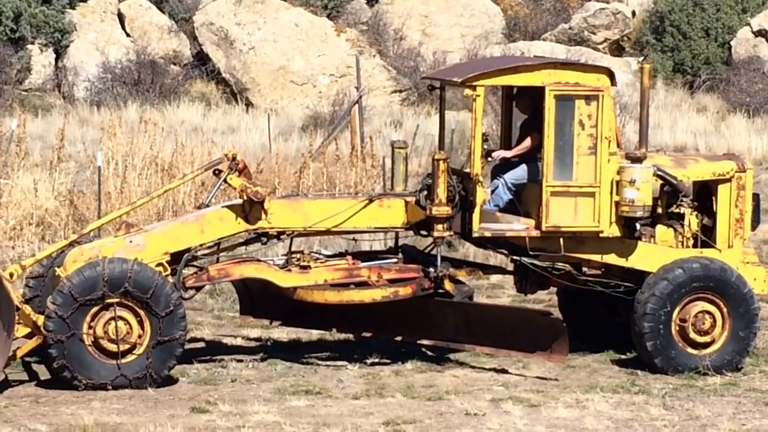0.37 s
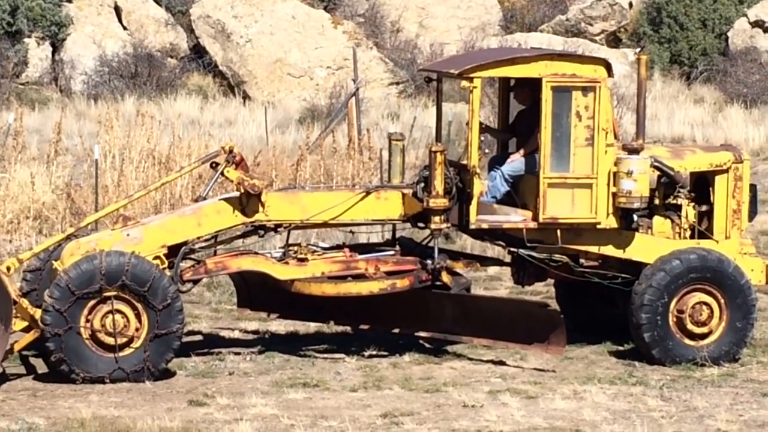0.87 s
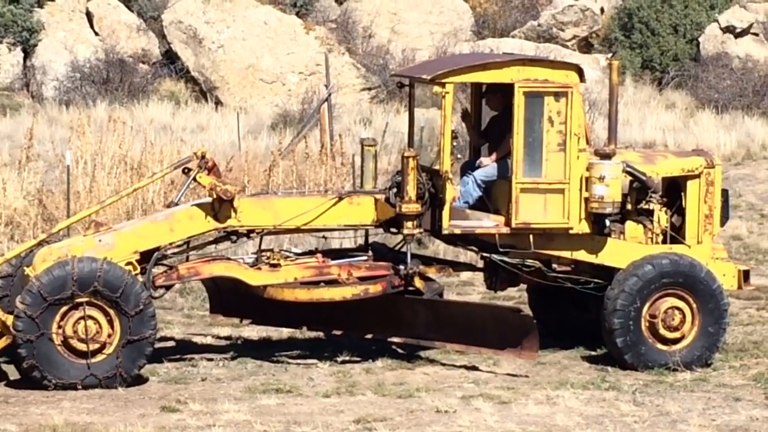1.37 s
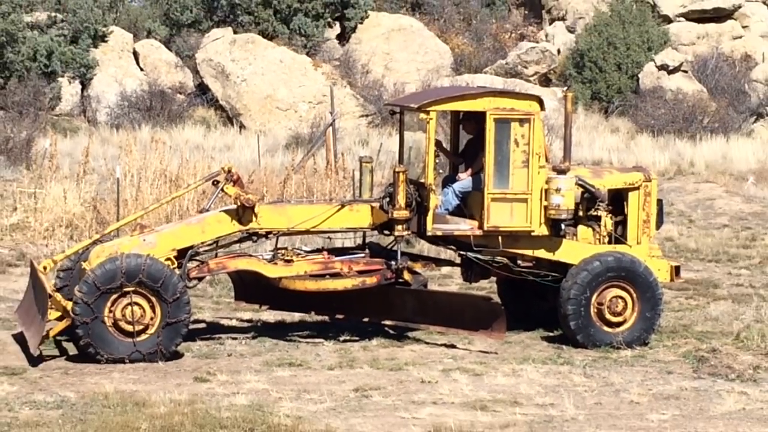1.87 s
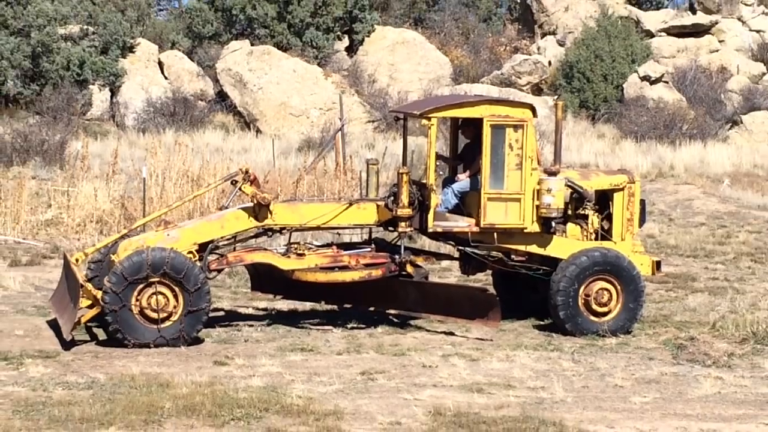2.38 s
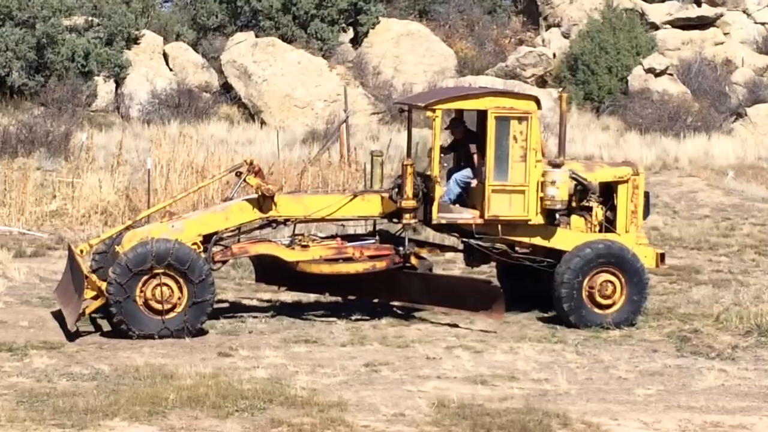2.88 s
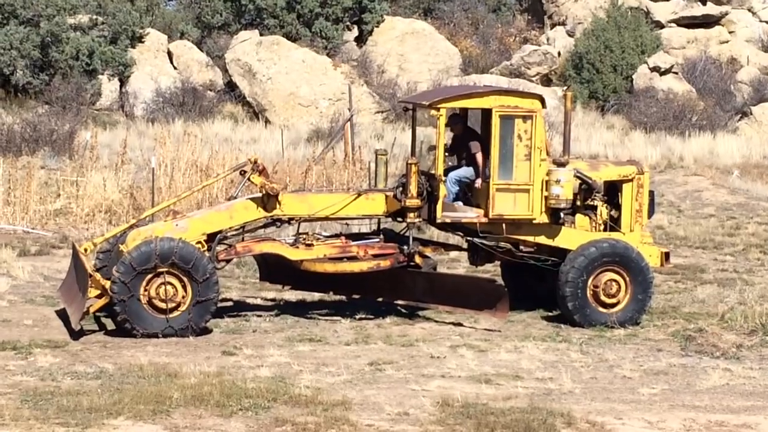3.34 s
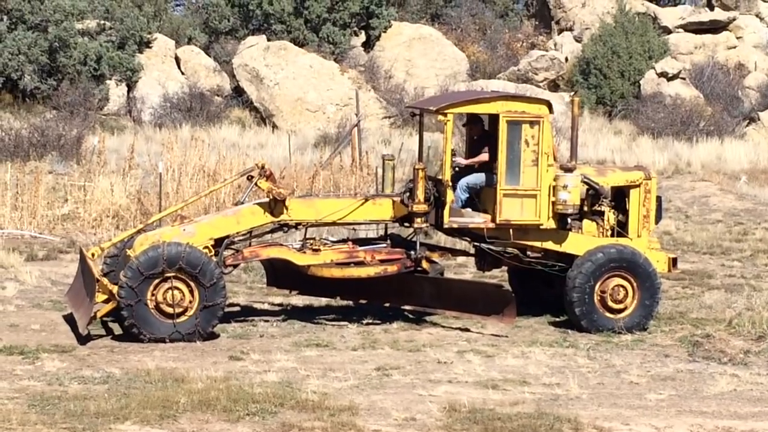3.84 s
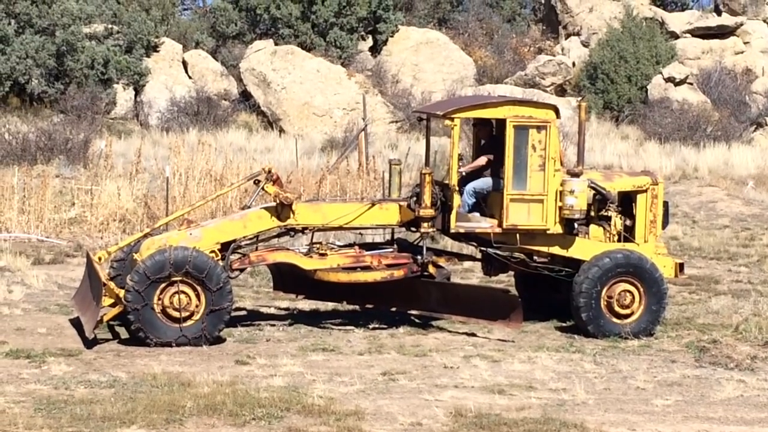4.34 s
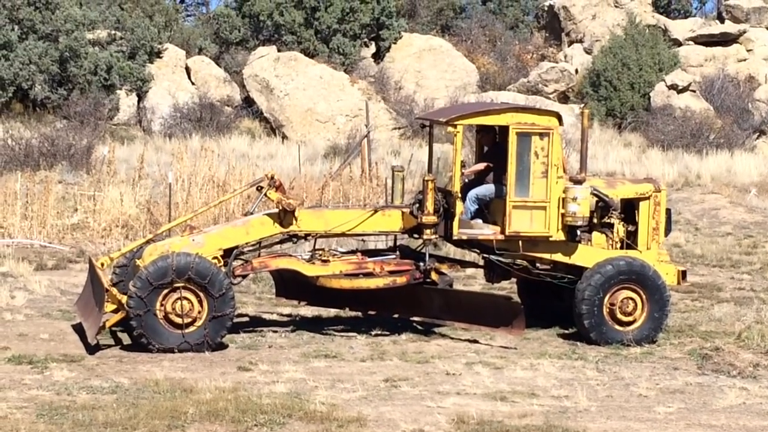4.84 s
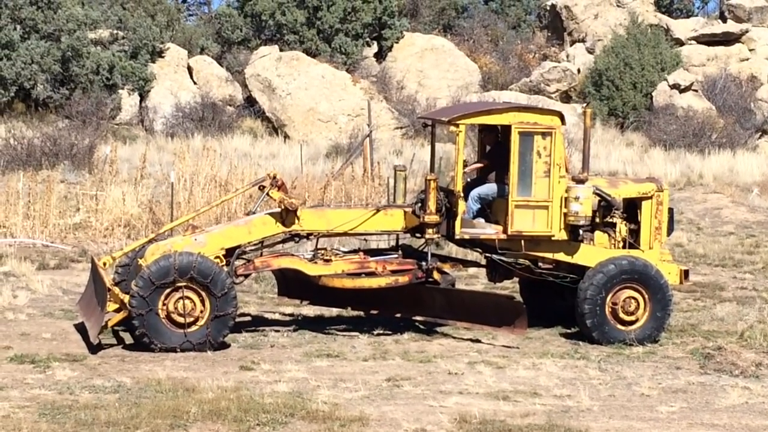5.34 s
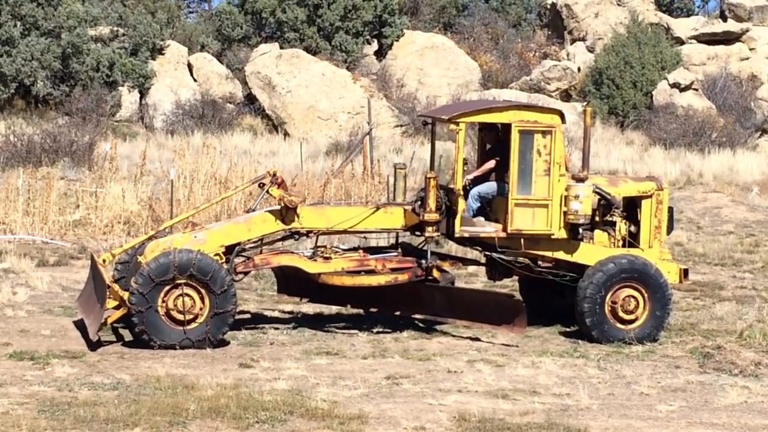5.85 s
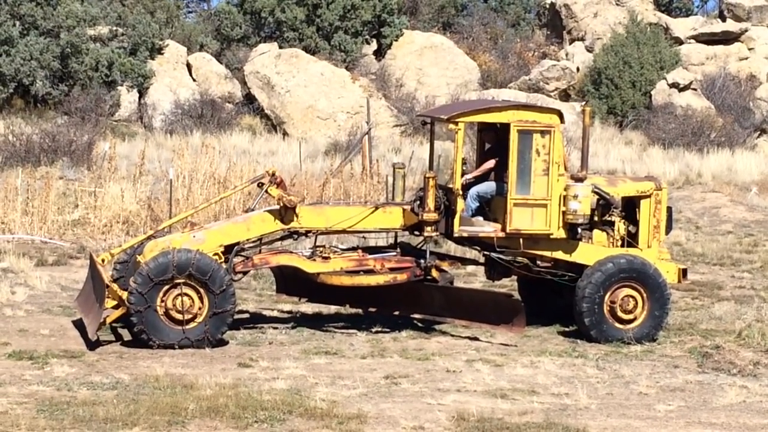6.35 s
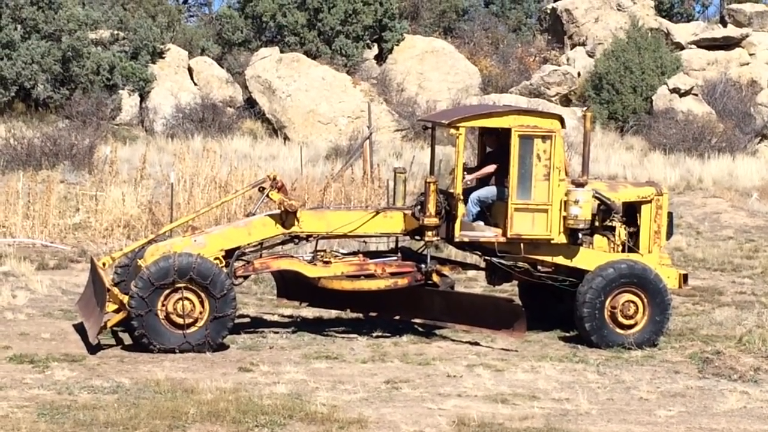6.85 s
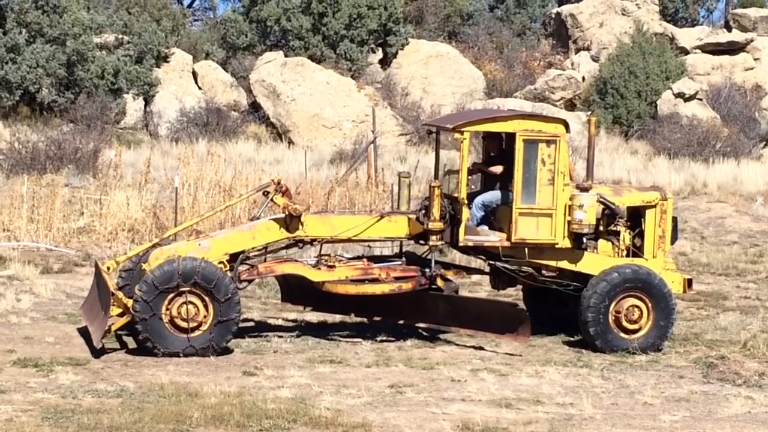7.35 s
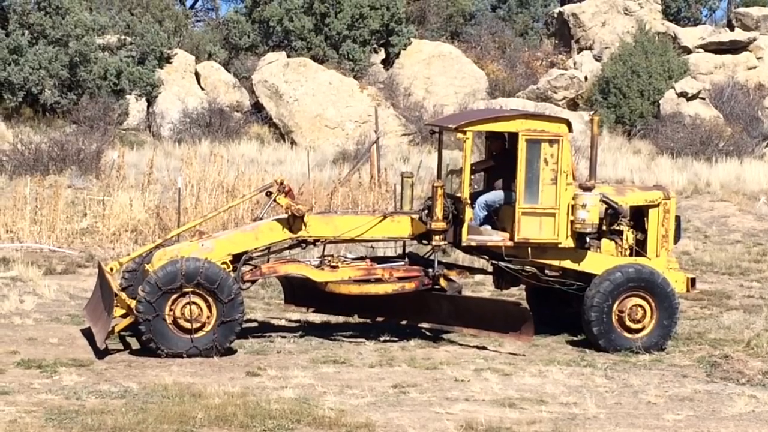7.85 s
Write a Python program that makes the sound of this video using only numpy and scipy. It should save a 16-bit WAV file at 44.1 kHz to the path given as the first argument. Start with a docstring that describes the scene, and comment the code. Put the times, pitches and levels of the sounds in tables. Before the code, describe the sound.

Steady low engine hum with soft clatter and ticking from an old grader outdoors, wind thumping the microphone, and a brief hydraulic whine and hiss midway.

```python
"""A low, even stack hum with gusts buffeting the microphone: a heavy diesel grader at a steady speed in
an open yard, heard from some metres away in a light wind. The hum is the eighth order of the engine cycle,
among other orders and in-between tones. Noise struck in each cycle makes block clatter and valve ticks;
rung modes make knocks and a few clinks. A hydraulic circuit is loaded at the start and once later: a sliding
pump whine and a hiss of shaped noise. The wind is rumble, flutter and short low pushes."""
import sys
import numpy as np
from scipy import signal
from scipy.fft import rfft, irfft
from scipy.io import wavfile
from scipy.ndimage import uniform_filter1d, map_coordinates

SR = 44100
rng = np.random.default_rng(int(sys.argv[2]) if len(sys.argv) > 2 else 0)


def to_wav(sig):
    """Store sig (one row per channel, or 1-D mono) as 16-bit WAV at the path in sys.argv[1].

    Samples outside -1..1 are clipped; the rate is SR.
    """
    pcm = np.clip(np.atleast_2d(sig), -1, 1) * 32767
    pcm = np.round(pcm).astype(np.int16)
    wavfile.write(sys.argv[1], SR, pcm.T)  # frames by channels


def to_linear_factor(level_db):
    """Convert decibel levels (scalar or array-like) to linear amplitude factors."""
    exponent = np.asarray(level_db, float) / 20
    return 10 ** exponent


N = 351036
EVEN_SPEED = 16.3  # engine cycles per second


def evened(x):
    """Scales to rms 1."""
    return x / np.sqrt(np.mean(x ** 2) + 1e-20)


def colour(x, points, modes=()):
    """Shapes x by a spectrum and by resonance bumps on it; rms 1."""
    hz = np.fft.rfftfreq(N, 1 / SR)
    f, level = np.transpose(points)
    db = np.interp(np.log(hz + 1), np.log(f + 1), level)
    for centre, width, peak_db in modes:
        db = db + peak_db / (1 + (2 * (hz - centre) / width) ** 2)
    return evened(irfft(rfft(x) * to_linear_factor(db), N))


def drift(hz):
    """Slow chance, rms 1, changing about hz times a second."""
    steps = rng.standard_normal(2000)
    return evened(map_coordinates(steps, [np.arange(N) * hz / SR], order=3))


def tone(turns, db, waver_db=0.):
    """A sine of rms db whose level wavers slowly."""
    return np.sqrt(2) * to_linear_factor(db + waver_db * drift(2.437)) * np.cos(2 * np.pi * turns)


def bell(s, half_s):
    """A smooth swell of height 1 around the moment s."""
    return np.exp(-((np.arange(N) / SR - s) / half_s) ** 2)


def shaft_speed():
    """Engine cycles per second at every sample; all parts of the machine follow it."""
    # engine speed: time_s, speed_cycles_per_s
    speeds = [(0, 16.036), (.54, 16.346), (.7, 16.308), (1.54, 16.422), (2.12, 16.386), (2.6, 16.29),
              (3.0, 16.333), (3.72, 16.265), (4.26, 16.263), (4.62, 16.309), (5.18, 16.299), (5.7, 16.227),
              (5.93, 16.105), (6.36, 16.291), (6.84, 16.386), (7.08, 16.336), (7.96, 16.38)]
    s, cycles_per_s = np.transpose(speeds)
    return np.interp(np.arange(N) / SR, s, cycles_per_s)


def gust_gain(calm_db, column):
    """The gusts add their power to a steady breeze."""
    # gusts on the microphone: time_s, half_width_s, rumble_db, flutter_db
    gusts = [(.1, .1, -34.5, -40.5), (.3, 0.21, -32, -44.5), (.62, 0.13, -29.5, -35),
             (.97, 0.2, -30, -44.5), (2.32, 0.099, -34.5, -44), (2.75, 0.068, -42, -55),
             (3.17, 0.068, -45, -34.5), (3.4, .1, -38, -40.5), (3.65, 0.13, -35, -38.5),
             (3.95, .1, -34.5, -47.5), (4.17, .13, -33, -38), (4.55, 0.057, -32, -53),
             (4.78, 0.065, -41, -43), (5.25, .1, -39, -45), (5.68, 0.12, -34, -38.5),
             (5.9, 0.076, -40, -36.5), (6.2, 0.088, -29.5, -41), (7.92, .08, -43, -41)]
    gust_power = sum(to_linear_factor(2 * row[column]) * bell(*row[:2]) ** 2 for row in gusts)
    return np.sqrt(to_linear_factor(2 * calm_db) + gust_power)


def wind():
    """Air pushing on the microphone: lumpy low rumble, a higher flutter in the gusts, and short pushes."""
    # spectrum of the rumble: frequency_hz, relative_density_db_per_hz
    rumble_spectrum = [(15, -16), (43, -9.5), (65, -1), (110, -4), (150, -9.5), (250, -32), (800, -67)]
    # spectrum of the flutter: frequency_hz, relative_density_db_per_hz
    flutter_spectrum = [(90, -26), (140, 0), (200, -0.5), (250, -12), (320, -26), (800, -69)]
    # single buffets: time_s, peak_db, pitch_hz
    buffets = [(0.136, -25, 81), (0.567, -27, 190), (.741, -28, 90), (0.955, -23, 80), (1.138, -28, 85),
               (2.288, -17, 89.5), (2.311, -22, 206), (2.848, -29, 200), (3.168, -28, 196),
               (3.712, -44, 180), (6.174, -22, 76), (6.186, -20.5, 354), (6.198, -23, 85),
               (6.222, -30, 111)]
    calm_rumble_db, calm_flutter_db = -40, -52.5
    rumble = colour(rng.standard_normal(N), rumble_spectrum)
    out = gust_gain(calm_rumble_db, column=2) * to_linear_factor(1.9 * drift(14)) * rumble
    flutter = colour(rng.standard_normal(N), flutter_spectrum)
    out += gust_gain(calm_flutter_db, column=3) * to_linear_factor(2.2 * drift(25)) * flutter
    t = np.arange(N) / SR
    for s, db, hz in buffets:
        u = (t - s) * hz
        out += to_linear_factor(db) * np.exp(-2.5 * u ** 2) * np.cos(2 * np.pi * u)
    return out


def clinks():
    """A loose part clinks now and then: a soft blow rings two dull modes."""
    # blows: start_s, level_db
    clink_times = [(6.9, -33), (7.745, -35)]
    # ringing modes of the part: pitch_hz, relative_level_db, t60_s
    clink_modes = [(975, -1, .12), (1135, -4, 0.11)]
    out = np.zeros(N)
    for start, db in clink_times:
        s = np.maximum(np.arange(N) / SR - start, 0)
        onset = np.minimum(s / .006, 1)
        for hz, mode_db, t60 in clink_modes:
            out += to_linear_factor(db + mode_db - 60 * s / t60) * onset * np.sin(2 * np.pi * hz * s)
    return out


def knocks(turn):
    """Each knock rings a casting briefly, a little harder, softer, higher or lower every time."""
    # three knocks in each cycle: place_in_cycle_0_to_1, level_db
    knock_places = [(.4, -42), (.895, -38), (.985, -40)]
    # ringing modes of the casting: pitch_hz, relative_level_db, t60_s
    knock_modes = [(1300, -4, 0.026), (1582, -1, 0.038), (2050, -3.5, .025)]
    out = np.zeros(N)
    for place, db in knock_places:
        since = turn - place + 1
        pitch_luck, level_luck = rng.standard_normal((200, 2))[since.astype(int)].T
        s = since % 1 / EVEN_SPEED
        ring = 0
        for hz, mode_db, t60 in knock_modes:
            bent_hz = hz * (1 + .015 * pitch_luck)
            ring = ring + to_linear_factor(mode_db - 60 * s / t60) * np.sin(2 * np.pi * bent_hz * s)
        out += to_linear_factor(db + 1.6 * level_luck) * np.minimum(s / .001, 1) * ring
    return out


def hydraulics(turn):
    """The pump whines unevenly between two orders, throbbing once a cycle, while oil hisses through a valve."""
    # hydraulic loads: start_s, end_s, hiss_db, whine_surge_as_valve_shuts_db, whine_lingers_s
    loads = [(-.5, 0.233, -50.5, 2.5, .06), (5.143, 5.92, -54.5, 10, .27)]
    # spectrum of the oil hiss: frequency_hz, relative_density_db_per_hz
    hiss_spectrum = [(1470, -21), (2500, 0), (3580, -0.5), (4160, -2), (4560, -4), (5710, -6.5),
                     (6390, -7.5), (9150, -11), (10300, -13), (13500, -16), (15200, -24.5)]
    # resonances on the hiss: centre_hz, width_hz, bump_db
    hiss_modes = [(4250, 130, 10), (5650, 200, 3), (9000, 900, 3.5)]
    whine_db, linger_db, fade_db_per_s = -48.5, -1.5, 110
    whine_order, slip_orders_per_s = 39.33, .7  # the whine slides down through a load
    load_rise_s, surge_s, shut_s = .09, .073, .044
    hiss_climb_db_per_s, hiss_share_of_surge = 6.5, .26
    t = np.arange(N) / SR
    whine_gain, hiss_gain, order = 0, 0, whine_order
    for start, end, hiss_db, surge_db, linger in loads:
        rise = np.clip((t - start) / load_rise_s, 0, 1) ** 2
        surge = surge_db * bell(end, surge_s)
        climb = -hiss_climb_db_per_s * np.clip(end - t, 0, 1) + hiss_share_of_surge * surge
        shutting = np.clip(1 + (end - t) / shut_s, 0, 1) ** 2
        hiss_gain = hiss_gain + to_linear_factor(hiss_db + climb) * rise * shutting
        after = np.where(t > end, linger_db, 0.) - fade_db_per_s * np.maximum(t - end - linger, 0)
        whine_gain = whine_gain + to_linear_factor(whine_db + surge + uniform_filter1d(after, size=2000)) * rise
        order = order + slip_orders_per_s * (end - t) * (t > start) * (t < end + 1)
    turns = np.cumsum(order * shaft_speed()) / SR
    throb = 1 + .5 * np.cos(2 * np.pi * turn)
    whine = tone(turns + .08 * drift(25), 2.2 * drift(20)) * throb
    hiss = to_linear_factor(.41 * drift(40)) * colour(rng.standard_normal(N), hiss_spectrum, hiss_modes)
    return whine_gain * whine + hiss_gain * hiss


def blows(turn, column, decay_turns, spread_db):
    """Gain that steps up or down at each blow and settles back; every blow is a little harder or softer."""
    # blows in each cycle: place_in_cycle_0_to_1, over_block_rattle_db, over_valve_rustle_db
    blow_places = [(.4, 2, 3.5), (.63, 8, -3), (.67, -6.5, 9.5), (0.892, -1.5, -3), (0.929, 3, 5),
                   (0.149, 3, -2.5)]
    gain = np.ones(N)
    for row in blow_places:
        since = turn - row[0] + 1
        luck = to_linear_factor(spread_db * rng.standard_normal(200))[since.astype(int)]
        gain += (to_linear_factor(row[column]) - 1) * luck * np.exp(-(since % 1) / decay_turns)
    return uniform_filter1d(gain, size=170)


def valves(turn):
    """Bright noise rustles, with sharp ticks where blows in the cycle lift it."""
    # spectrum of the rustle: frequency_hz, relative_density_db_per_hz
    valve_spectrum = [(1410, -27.5), (2400, -1.5), (2700, -4), (3310, -4.5), (6360, -16.5), (8850, -20),
                      (13500, -36), (14500, -44), (15200, -53)]
    valves_db = -54
    rustle = rng.standard_normal(N) * blows(turn, column=2, decay_turns=.041, spread_db=3)
    return to_linear_factor(valves_db + .51 * drift(30)) * colour(rustle, valve_spectrum)


def block(turn):
    """The same parts strike in order every cycle, so part of the rattle repeats, mostly its middle."""
    # spectrum of the rattle: frequency_hz, relative_density_db_per_hz
    block_spectrum = [(200, 0.5), (320, -0.5), (420, -1), (520, -0.5), (700, -2.5), (1100, -2.5),
                      (1600, -3.5), (2050, -5), (2500, -16.5), (4000, -40.5)]
    # resonances of the block: centre_hz, width_hz, bump_db
    block_modes = [(564, 8, 2), (670, 40, 1), (839, 28, 5), (977, 40, 3.5), (1160, 96, 2.5), (1454, 45, 4),
                   (1470, 73, 1), (1840, 63, 4)]
    block_db = -41  # at even speed or above
    pattern = rng.standard_normal(2048)
    place = (turn + .0015 * drift(5)) % 1 * 2048
    repeated = np.interp(place, np.arange(2048), pattern, period=2048)
    middle_band = signal.butter(2, [600, 2000], "bandpass", fs=SR, output="sos")
    repeated = signal.sosfilt(middle_band, repeated)
    sag = np.maximum(EVEN_SPEED - shaft_speed(), 0)  # the rattle hardens as load slows the shaft
    fresh = rng.standard_normal(N)
    rattle = fresh + to_linear_factor(-12) * evened(repeated)
    rattle = rattle * blows(turn, column=1, decay_turns=.055, spread_db=2.2)
    return to_linear_factor(block_db + 9.7 * sag + .5 * drift(7.5)) * colour(rattle, block_spectrum, block_modes)


def dip_db(column):
    """Level change in the wind, mostly a sinking, of the hum (column 2) or the tones above it (column 3)."""
    # brief dips and swells: time_s, half_width_s, hum_db, tones_above_db
    dips = [(.0, 0.055, 1, -9), (.36, 0.2, -2, -4.5), (.8, .06, 0, -3.5), (3.2, 0.052, -12.5, -3),
            (3.22, 0.09, 3.5, -4), (3.68, 0.11, 0, -4.5), (4.22, 0.034, -6, 0), (4.2, 0.18, -2, -4.5),
            (4.8, 0.069, 0, -0.5), (5.1, 0.48, -0.5, -1), (5.7, 0.06, 1.5, -8), (5.88, 0.17, -3, -7),
            (6.2, 0.035, -6, -3)]
    return sum(row[column] * bell(*row[:2]) for row in dips)


def dipped(x):
    """The low tones above the hum, about 225 to 450 Hz, sink briefly in the wind."""
    hz = np.fft.rfftfreq(N, 1 / SR)
    low = irfft(rfft(x) / (1 + (225 / (hz + 1)) ** 10) / (1 + (hz / 450) ** 6), N)
    return x + (to_linear_factor(dip_db(column=3)) - 1) * low


def exhaust(turn):
    """The low orders start in step with the firings; the higher ones arrive by many paths, so out of step."""
    # orders other than the hum: cycle_multiple, level_db
    orders = [(4, -41), (9, -38.5), (10, -50), (12, -55), (13, -55), (15, -59), (16, -46), (17, -57),
              (21, -64), (22, -62), (23, -64), (24, -58), (25, -57), (28, -58), (30, -60), (32, -60),
              (33, -59), (34, -54), (36, -61), (51, -58), (52, -59), (59, -60), (60, -63), (67, -61),
              (68, -61)]
    # tones between the orders, many of which make the orders throb: cycle_multiple, level_db
    between_orders = [(13.14, -60), (21.4, -64), (24.4, -60), (25.4, -59), (33.1, -57), (33.4, -64),
                      (35.1, -61), (41.1, -64)]
    # side tones, keyed by (order, side -1 below or 1 above): level_db
    side_tones = {(8, -1): -43, (8, 1): -49, (4, 1): -47}
    hum_db = -23.5
    out = tone(8 * turn, hum_db + dip_db(column=2))
    lag = rng.random(100) * (np.arange(100) > 9)  # an in-between tone shares the lag of the order below it
    speed = shaft_speed()
    sag = np.maximum(EVEN_SPEED - speed, 0)
    # the ninth swells as load slows the shaft; the sixteenth follows the dips most
    extra_db = {9: 22 * sag, 16: 1.7 * dip_db(column=3)}
    for k, db in orders + between_orders:  # high orders waver and smear more
        turns = k * turn + lag[int(k)] + .0012 * k * drift(8)
        out += tone(turns, db + extra_db.get(k, 0), waver_db=.8 + .02 * k)
    # a slow wobble puts side tones beside the low orders; it quickens with the shaft speed
    wobble_hz, wobble_hz_per_speed, wobble_least_hz, wobble_start_turn = 5, 28, 3.4, .79
    rate_hz = np.maximum(wobble_hz + wobble_hz_per_speed * (speed - EVEN_SPEED), wobble_least_hz)
    wobble = wobble_start_turn + np.cumsum(rate_hz) / SR
    for (k, side), db in side_tones.items():
        out = out + tone(k * turn + side * wobble, db, waver_db=2.5)
    return out


def scene():
    """All parts of the machine follow one shaft; wind and loose clinks keep their own time."""
    start_turn = .227
    turn = start_turn + np.cumsum(shaft_speed()) / SR
    engine = dipped(exhaust(turn) + block(turn)) + valves(turn) + hydraulics(turn)
    return (engine + wind() + knocks(turn) + clinks())[None]


def roll_off(x):
    """The treble ends steeply here."""
    return signal.sosfilt(signal.butter(12, 15170, fs=SR, output="sos"), x)


def record(dry):
    """A soft start and end, each about 4 ms."""
    mix = dry * signal.windows.tukey(N, .001)
    return roll_off(mix)


dry = scene()
out = record(dry)
to_wav(out)
```